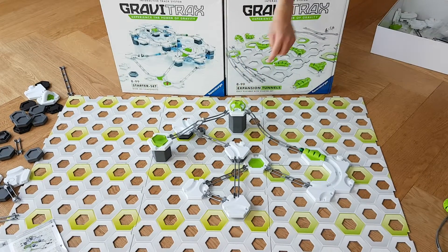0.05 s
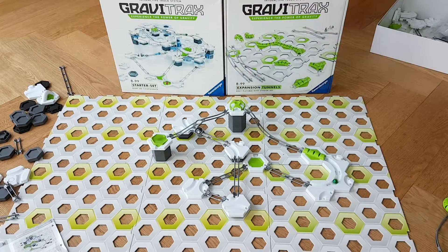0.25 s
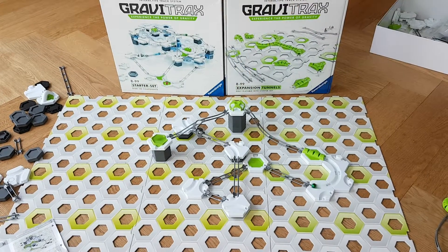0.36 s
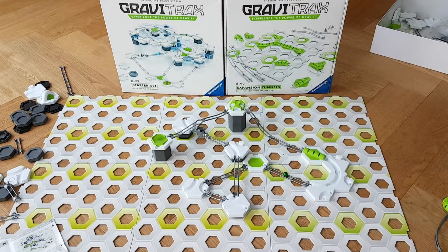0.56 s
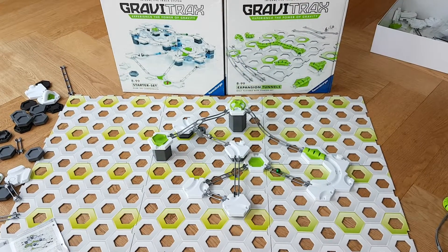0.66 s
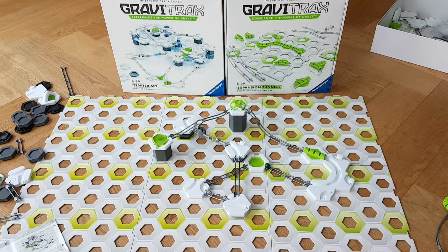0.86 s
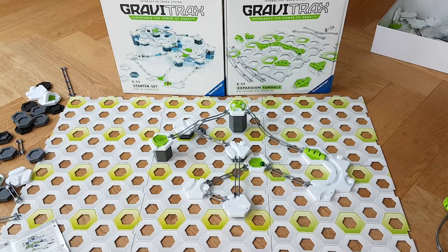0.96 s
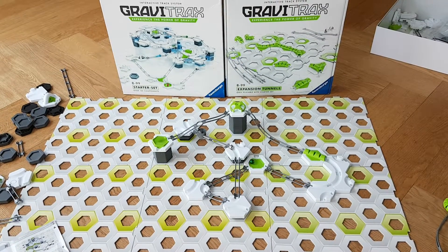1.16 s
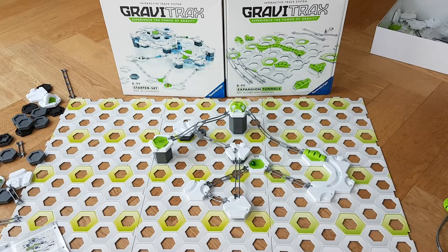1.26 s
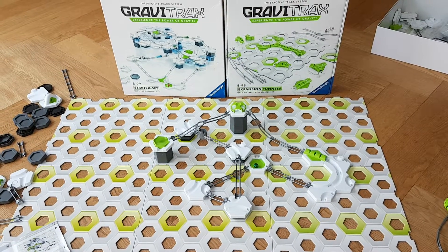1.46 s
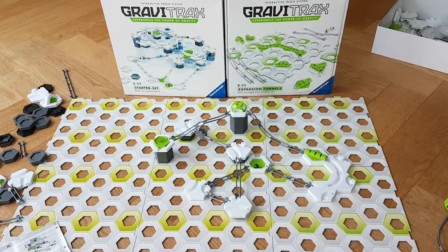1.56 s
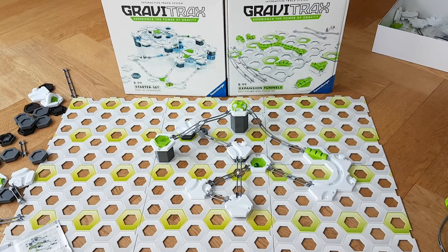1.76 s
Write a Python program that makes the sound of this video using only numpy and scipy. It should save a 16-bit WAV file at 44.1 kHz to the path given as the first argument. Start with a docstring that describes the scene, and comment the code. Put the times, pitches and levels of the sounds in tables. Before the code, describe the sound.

Marble clacking and rattling along a plastic marble run, thinning to light clicks indoors.

```python
"""Over faint hiss and a low rumble, a steel marble rolls down thin rails, its tiny bumps driving the track.
From 0.2 s it clatters through a plastic curve: each impact knocks the hollow tiles, rings the rails and
cracks, and a live room with a wooden floor reverberates. From 0.8 s it ticks lightly over the joints.
Near 1.6 s come a faint swish and a soft double thud. Throughout, the track is weak and dull on the right."""
import sys
import numpy as np
from scipy import signal
from scipy.fft import rfft, irfft, next_fast_len
from scipy.io import wavfile
from scipy.ndimage import map_coordinates

SR = 44100
rng = np.random.default_rng(int(sys.argv[2]) if len(sys.argv) > 2 else 0)


def store_wav(level_fs):
    """Save 16-bit WAV to argv[1]."""
    pcm = np.round(np.clip(np.atleast_2d(level_fs), -1, 1) * 32767)
    wavfile.write(sys.argv[1], SR, pcm.T.astype(np.int16))


N = 79380


def amp(db):
    """Amplitude ratio of a level in decibels."""
    return 10 ** (np.asarray(db) / 20)


def unit_rms(x):
    """Normalisation to an rms of 1."""
    return x / np.sqrt(np.mean(x ** 2) + 1e-20)


def curve_at(points, hz):
    """Interpolation of (frequency_hz, value) points on a logarithmic frequency axis."""
    point_hz, values = np.transpose(points)
    return np.interp(np.log(hz + 1), np.log(point_hz + 1), values)


def filtered(x, response):
    """Linear filtering: the spectrum of x is multiplied by a frequency response."""
    n = x.shape[-1]
    size = next_fast_len(n + 4096)
    return irfft(rfft(x, size) * response(np.fft.rfftfreq(size, 1 / SR)), size)[..., :n]


def coloured(x, spectrum):
    """Spectral shaping of x, at an rms of 1."""
    return unit_rms(filtered(x, lambda hz: amp(curve_at(spectrum, hz))))


def add(out, start_s, x):
    """Superposition of x on out from start_s."""
    i = round(start_s * SR)
    out[..., i:i + x.shape[-1]] += x[..., :max(N - i, 0)]


# Noise floor on each side: frequency_hz, relative_density_db
FLOOR_LEFT = [(12, -38), (30, -24), (60, -3.5), (120, -12), (250, -10), (600, -9), (1500, -10.5),
              (3000, -26), (6000, -26.5), (10000, -36), (15500, -24.5)]
FLOOR_RIGHT = [(12, -49), (30, 3.5), (60, 3.5), (115, 4), (220, -8.5), (600, -11), (1500, -17), (3000, -21),
               (6000, -31), (10000, -33), (15500, -24)]
def background(left_db=-65, right_db=-63):
    """Stationary noise: room rumble and microphone hiss, uncorrelated between the sides."""
    return np.array([amp(left_db) * coloured(rng.standard_normal(N), FLOOR_LEFT),
                     amp(right_db) * coloured(rng.standard_normal(N), FLOOR_RIGHT)])


# Spectrum of the floor's rumble: frequency_hz, relative_density_db
RUMBLE_SPECTRUM = [(10, -48), (30, -20), (60, -4), (115, -6), (170, -11.5), (300, -19.5), (800, -70)]
# Its envelope: time_s, level_db
RUMBLE_ENVELOPE = [(0, -77), (.2, -68), (.35, -62), (.7, -66.5), (.95, -72), (1.2, -69), (1.45, -70.5),
                   (1.8, -67.5)]
def floor_rumble(left_db=-2):
    """Amplitude-modulated noise: a low rumble swells while the marble runs, stronger on the right."""
    time_s, level_db = np.transpose(RUMBLE_ENVELOPE)
    envelope = amp(np.interp(np.arange(N) / SR, time_s, level_db))
    return coloured(rng.standard_normal((2, N)), RUMBLE_SPECTRUM) * envelope * amp([[left_db], [0]])


# Reverberation time of the room: frequency_hz, t60_s
ROOM_DECAY = [(200, 1), (1600, 0.45), (3000, 0.47), (7000, 0.43), (15000, 0.18)]
def room_tail(onset_s=0.0033):
    """Diffuse reverberation: a fresh stereo noise tail decays exponentially, the treble first."""
    hz, frame_s, bands = signal.stft(rng.standard_normal((2, SR // 2)), SR, nperseg=256)
    decay = amp(-60 * frame_s / curve_at(ROOM_DECAY, hz)[:, None])
    tail = signal.istft(bands * decay, SR, nperseg=256)[1]
    t = np.arange(tail.shape[1]) / SR
    tail *= 1 - np.exp(-(t / onset_s) ** 2)
    return tail / np.linalg.norm(tail[0])


def in_room(x, tail, wet_db=0, right_direct_db=-11, right_room_db=3.5):
    """Direct and reverberant fields add; on the right the reverberant field dominates."""
    wet = signal.fftconvolve(x[None], tail, axes=1)
    left, right = wet * amp(wet_db) * np.linalg.norm(x) / np.linalg.norm(wet[0])
    direct = np.pad(x, (0, len(left) - len(x)))
    return np.array([direct + left, amp(right_direct_db) * direct + amp(right_room_db) * right])


# Responses of tiles, rails and hard contact, rolled on or struck: frequency_hz, relative_density_db
TILE_SPECTRUM = [(60, -77), (250, -31.5), (450, -33), (700, -15.5), (1000, -12), (1350, -7), (1680, 1),
                 (2050, -5), (2500, -19.5), (4000, -70), (9000, -78)]
RAIL_SPECTRUM = [(300, -83), (900, -19), (1900, -31), (2450, -1.5), (3000, -3), (3700, -4.5), (4200, -11.5),
                 (4900, -15.5), (9000, -46)]
CRACK_SPECTRUM = [(300, -66), (1500, -77), (3800, -6.5), (4900, -0.5), (6800, -2.5), (7800, 0.5),
                  (10000, -4), (12300, -0.5), (15000, -8), (16000, -14.5)]
# Relative envelopes of the rolling: time_s, tile_rumble_db, rail_whirr_db, grit_db
ROLL_ENVELOPES = [(0, -55, -60, -61), (.07, -53, -51, -63), (.14, -49, -49, -59), (0.247, -48, -44, -62.5),
                  (.275, -37, -54, -50), (.38, -34.5, -37.5, -38.5), (.45, -31, -46.5, -50),
                  (.51, -34.5, -41, -45), (.585, -46, -44, -45.5), (.65, -45.5, -52.5, -56),
                  (.76, -49, -58.5, -64.5), (0.901, -62.5, -66.5, -72.5), (1.05, -75, -79, -110),
                  (1.25, -58, -66, -74), (1.33, -62, -55, -70), (1.41, -74, -58, -77),
                  (1.55, -67, -67, -84), (1.8, -64, -66.5, -73)]
def rolling(bumps_per_s=2200, bump_spread_db=2.5, judder_per_s=70, judder_db=2.5, gain_db=-8.5):
    """Roughness excitation: tiny random bumps under the marble drive tiles, rails and hard contact."""
    time_s, *envelopes_db = np.transpose(ROLL_ENVELOPES)
    t = np.arange(N) / SR
    judder = map_coordinates(rng.standard_normal(1024), [t * judder_per_s], mode="wrap")
    impulses = (rng.random(N) < bumps_per_s / SR) * rng.choice([-1, 1], N)
    bumps = impulses * amp(bump_spread_db * rng.standard_normal(N))
    drives = (bumps * amp(judder_db * judder), bumps, bumps)  # the marble presses unevenly on the tiles
    spectra = (TILE_SPECTRUM, RAIL_SPECTRUM, CRACK_SPECTRUM)
    direct = sum(amp(np.interp(t, time_s, level_db)) * coloured(drive, spectrum)
                 for level_db, drive, spectrum in zip(envelopes_db, drives, spectra))
    return amp(gain_db) * in_room(direct, room_tail(), wet_db=-2)[:, :N]


def strike(spectrum, modes, modes_db, pitch_ratio=1, attack_s=0.00024, hold_s=0.0019, burst_t60_s=0.021):
    """Impulse response of one part: a short dense burst plus damped modes, modes_db relative to it."""
    t = np.arange(6000) / SR
    envelope = amp(-60 * np.maximum(t - hold_s, 0) / burst_t60_s)
    shifted = [(hz * pitch_ratio, db) for hz, db in spectrum]
    burst = unit_rms(envelope * coloured(rng.standard_normal(len(t)), shifted))
    ring = np.zeros(len(t))
    for hz, db, t60_s in modes:
        decay = amp(db + rng.normal(0, 0.98) - 60 * t / t60_s)
        ring += decay * rng.choice([-1, 1]) * np.sin(2 * np.pi * hz * pitch_ratio * t)
    rise = 1 - np.exp(-(t / attack_s) ** 2)
    response = rise * (burst + amp(modes_db) * unit_rms(ring))
    return unit_rms(response) * np.sqrt(np.mean(envelope ** 2))


def softened_crack(crack_db, hard_hit_db=-46, corner_hz=6500):
    """Spectral tilt: the further an impact falls below a hard hit, the more treble its crack loses."""
    hz, db = np.transpose(CRACK_SPECTRUM)
    tilt_db_per_octave = 0.16 * min(crack_db - hard_hit_db, 0)
    octaves_above = np.log2(np.maximum(hz / corner_hz, 1))
    return np.column_stack([hz, db + tilt_db_per_octave * octaves_above])


# Normal modes of tiles, rails and hard contact: frequency_hz, relative_level_db, t60_s
TILE_RESONANCES = [(1491, 5.5, 0.072), (1648.6, 9, 0.093), (1810, -30, .06), (1900, -22, .05),
                   (2176, 14.5, 0.01)]
RAIL_RESONANCES = [(2500, 2, 0.016), (2983, -2.5, 0.044), (3040, 10.5, 0.013), (3560, -24, 0.049)]
CRACK_RESONANCES = [(4940, 3, 0.12), (5140, -26.5, 0.091), (6120, 12.5, 0.051), (8250, -7, 0.056),
                    (9010, 8.5, 0.06), (11100, 4, .015)]
# Impacts of the marble: start_s, knock_db, ring_db, crack_db, tile_pitch_hz, rail_pitch_hz
IMPACTS = [(0.1987, -36.5, -39, -53, 1736, 3490), (0.2551, -28, -30, -35, 1641, 2916),
           (0.266, -46, -36, -35.5, 1475, 3040), (0.2711, -29, -44, -42.5, 1540, 2800),
           (0.3034, -36, -48, -41, 1561, 2950), (.3180, -32.5, -43, -64, 1550, 2840),
           (.3260, -37, -44, -51, 1610, 2930), (0.3355, -37, -34, -29, 1666, 2960),
           (0.3443, -32, -42.5, -30, 1780, 3440), (0.367, -40, -43, -56, 1680, 3240),
           (.4050, -30, -43.5, -43, 1710, 3520), (.4300, -29.5, -54, -46, 1640, 2760),
           (0.4669, -30, -55, -37, 1770, 2620), (0.4722, -51, -41, -34, 1900, 3000),
           (0.4934, -35.5, -55, -42, 1810, 2360), (.5000, -37.5, -47, -63, 1677, 2480),
           (0.5399, -46, -43, -43, 1690, 2980), (0.5479, -36, -52, -36, 1723, 2950),
           (0.5533, -33.5, -44.5, -43.5, 1680, 2735), (0.5809, -36.5, -59, -44, 1830, 2900),
           (.8170, -53, -65, -86, 1657, 2840), (.8590, -62, -59.5, -72, 1680, 2880),
           (0.9896, -61, -66, -87, 1795, 2750), (1.0600, -56, -53.5, -76, 1730, 2600),
           (1.0705, -66, -62.5, -78, 1620, 2510), (1.114, -47.5, -43, -50, 1668, 2940),
           (1.126, -42.5, -72, -71, 1722, 3060), (1.2573, -46.5, -45, -55, 1537, 2967),
           (1.2715, -44.5, -44, -56, 1538, 3010), (1.28, -45.5, -42, -74, 1578, 2640),
           (1.2841, -43, -45, -53, 1587, 2760), (1.3143, -48.5, -50.5, -71, 1578, 2860),
           (1.3300, -48, -54, -75, 1478, 2890), (1.3450, -64, -52.5, -71, 1510, 2900),
           (1.6158, -54, -58.5, -56, 1610, 3520), (1.628, -52.5, -58.5, -76, 1586, 2800),
           (1.7392, -78, -62, -66, 1650, 3600)]
def impacts(tile_reference_hz=1671.5, rail_reference_hz=2971, radiation_cutoff_hz=396):
    """Impact excitation: each hit on a joint or wall sets the three parts vibrating in its own mix."""
    out = np.zeros((2, N))
    for start_s, knock_db, ring_db, crack_db, tile_hz, rail_hz in IMPACTS:
        tail = room_tail()
        knock = strike(TILE_SPECTRUM, TILE_RESONANCES, -2, pitch_ratio=tile_hz / tile_reference_hz)
        ring = strike(RAIL_SPECTRUM, RAIL_RESONANCES, 3.5, pitch_ratio=rail_hz / rail_reference_hz)
        crack = strike(softened_crack(crack_db), CRACK_RESONANCES, modes_db=-9)
        add(out, start_s, amp(knock_db) * in_room(knock, tail))
        add(out, start_s, amp(ring_db) * in_room(ring, tail, wet_db=0.5))
        add(out, start_s, amp(crack_db) * in_room(crack, tail))
    # Small parts radiate low frequencies poorly.
    return signal.sosfilt(signal.butter(2, radiation_cutoff_hz, "high", fs=SR, output="sos"), out)


# Spectrum of the swish: frequency_hz, relative_density_db
SWISH_SPECTRUM = [(300, -64), (2000, -5), (6000, -10), (10000, -4), (14000, 0), (16000, -7)]
def swish(peak_s=1.6, width_s=0.03, gain_db=-67):
    """Amplitude-modulated noise: a faint airy hiss swells and fades under a Gaussian envelope."""
    t = np.arange(N) / SR
    envelope = np.exp(-.5 * ((t - peak_s) / width_s) ** 2)
    return amp(gain_db) * envelope * coloured(rng.standard_normal(N), SWISH_SPECTRUM)


# The two bumps of the thud: start_s, relative_level_db, pitch_hz
THUD_BUMPS = [(1.589, -49, 105), (1.601, -46, 127)]
def thud(t60_s=0.033, rise_s=0.0011, left_db=-15, right_db=7):
    """Damped oscillation: two low sinusoids die quickly, a soft double bump mostly on the right."""
    out, t = np.zeros(N), np.arange(SR // 4) / SR
    rise = 1 - np.exp(-t / rise_s)
    for start_s, level_db, pitch_hz in THUD_BUMPS:
        decay = amp(level_db - 60 * t / t60_s)
        add(out, start_s, rise * decay * np.sin(2 * np.pi * pitch_hz * t))
    return out * amp([[left_db], [right_db]])


# Frequency response of the right side to track and swish: frequency_hz, gain_db
RIGHT_RESPONSE = [(100, 5), (380, -8.5), (700, -13.5), (1300, -21), (2400, -24), (4400, -31.5),
                  (8000, -39.5), (15000, -37)]
def scene():
    """Superposition: track and swish, muffled on the right, add to thud, rumble and background."""
    left, right = impacts() + rolling() + swish()
    muffled = filtered(right, lambda hz: amp(curve_at(RIGHT_RESPONSE, hz)))
    return np.array([left, muffled]) + thud() + floor_rumble() + background()


def record(dry):
    """Band limiting: an ideal low-pass filter removes everything above its cutoff."""
    cutoff_hz = 16100
    return filtered(dry, lambda hz: hz < cutoff_hz)


dry = scene()
out = record(dry)
store_wav(out)
```